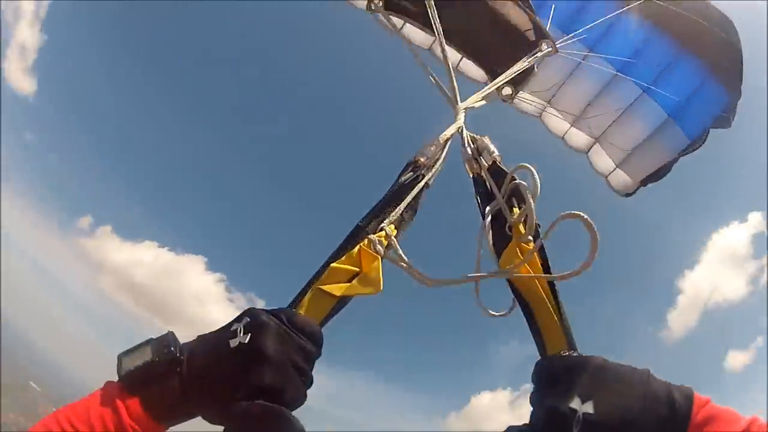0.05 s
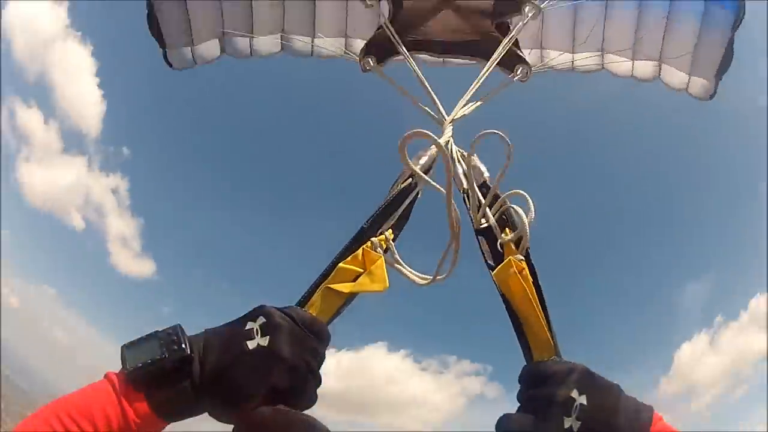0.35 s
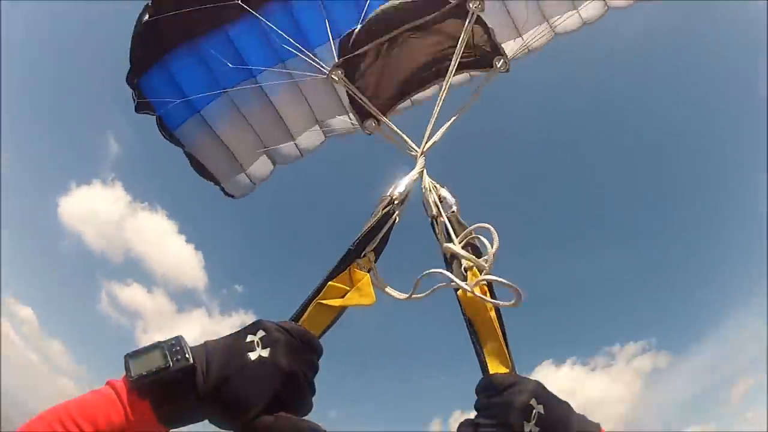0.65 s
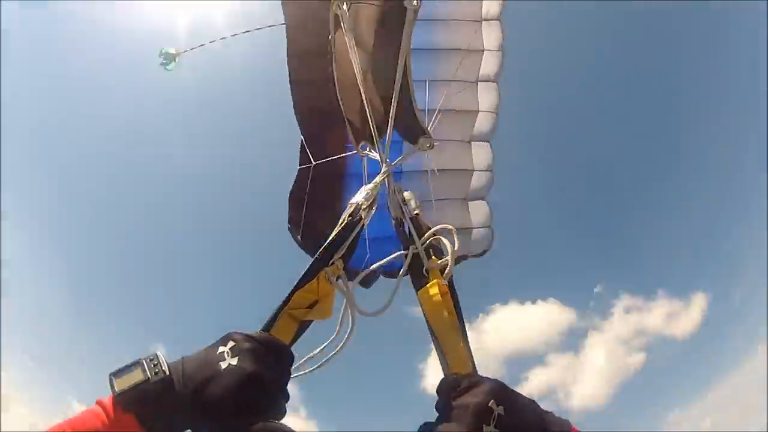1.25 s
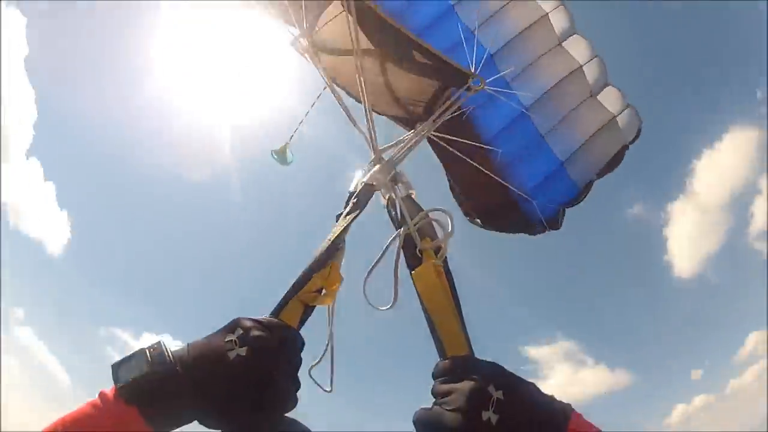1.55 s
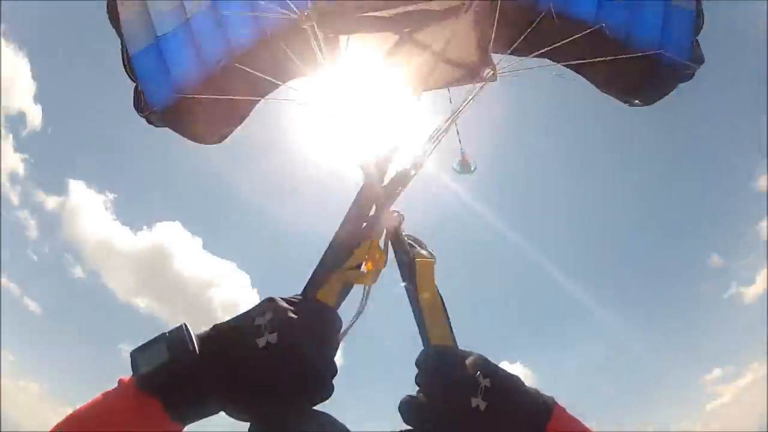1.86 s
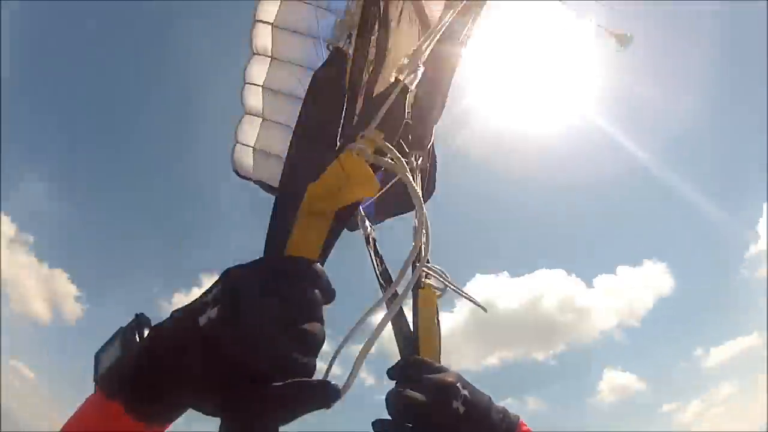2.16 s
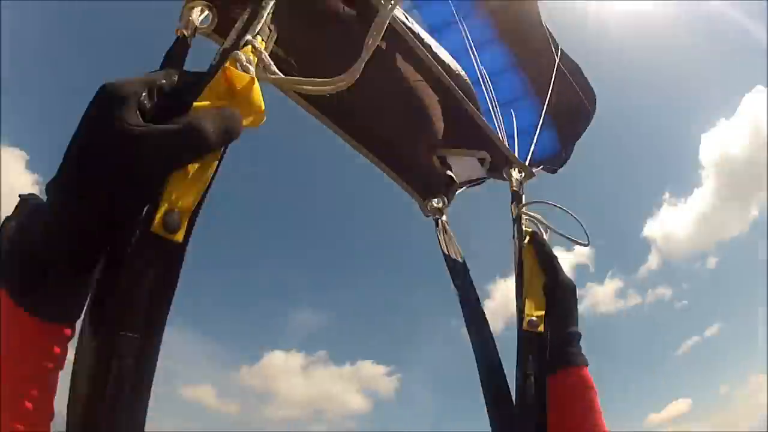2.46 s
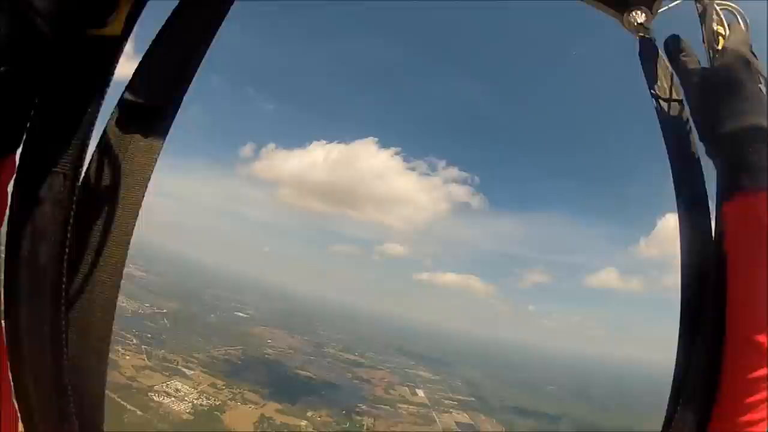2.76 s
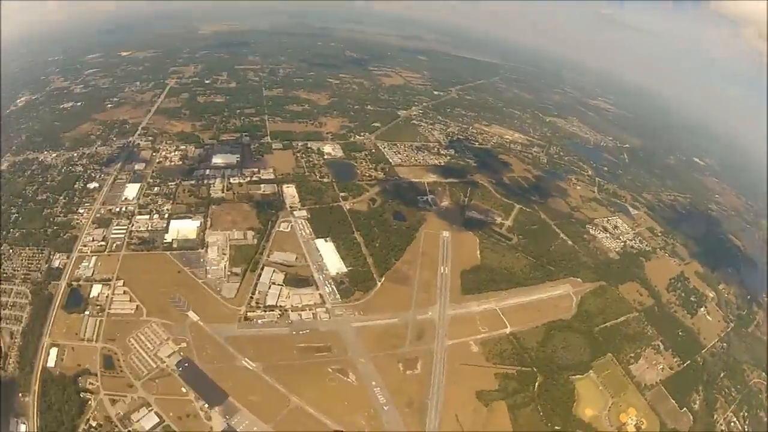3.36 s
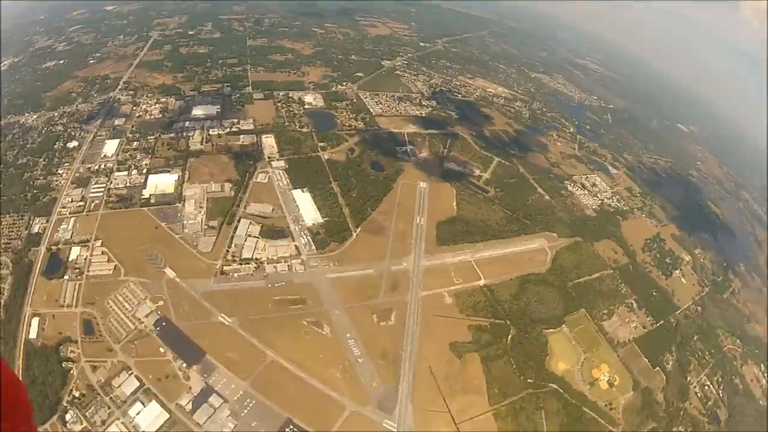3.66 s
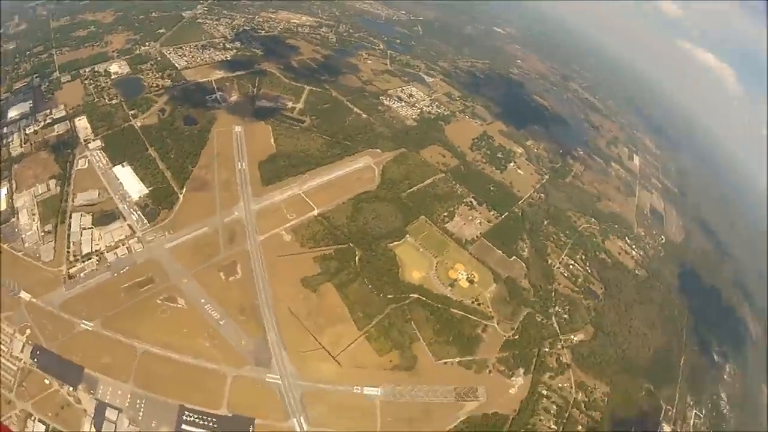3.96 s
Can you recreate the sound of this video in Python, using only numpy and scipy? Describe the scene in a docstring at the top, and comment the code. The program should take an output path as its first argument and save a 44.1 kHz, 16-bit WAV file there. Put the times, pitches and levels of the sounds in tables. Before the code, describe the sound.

Wind hisses in swells and rumbles on a helmet microphone under an open parachute, with a low thump at the start. Fabric flutters and straps scrape lightly, and the lines whistle faintly between 1 and 2 seconds. Near 2.5 seconds a strap squeaks briefly and snaps tight. Fabric flicks follow around 3 seconds, soft knocks at 3.4, and a hard, booming knock on the helmet just before 4.

```python
"""A low thump of wind and a hiss of air, heard under an open parachute from a camera case on a helmet.
The air rushes past in swells, sings faintly on the lines and shakes the closed case into a rumble.
Fabric flutters and flicks, the risers (the straps up to the lines) scrape, and one strap squeaks and
snaps tight. At the end something knocks hard on the helmet and makes it boom.
The camera's coarse sampling mirrors the sound into the treble."""
import sys
import numpy as np
from scipy import signal
from scipy.fft import rfft, irfft, next_fast_len
from scipy.io import wavfile
from scipy.ndimage import uniform_filter1d, map_coordinates

SR = 44100
rng = np.random.default_rng(int(sys.argv[2]) if len(sys.argv) > 2 else 0)


def generate_wav(sig):
    """Save sig (samples, or channels by samples) to the path in sys.argv[1] as 16-bit PCM at SR."""
    pcm = np.round(np.clip(np.atleast_2d(sig).T, -1, 1) * 32767).astype(np.int16)
    wavfile.write(sys.argv[1], SR, pcm)


N = 176400
T = np.arange(N) / SR

# Levels are relative. A colour says how strong each pitch is in a noise; t60 is the time to fade 60 dB.
# how loud the rushing air is, in six stretches: t/s, level/dB
RUSH_LEVELS = [
    [(0.0, -49.5), (0.222, -54.5), (0.284, -49.5), (0.304, -62), (0.418, -66), (0.432, -57), (0.72, -66)],
    [(0.79, -52.5), (0.844, -48), (1.054, -44), (1.064, -42), (1.224, -43), (1.234, -45.5), (1.3, -43)],
    [(1.33, -44.5), (1.336, -41.5), (1.362, -46), (1.44, -42.5), (1.654, -47), (1.682, -54), (1.76, -53)],
    [(1.8, -50), (1.95, -49.5), (2.038, -44), (2.064, -45.5), (2.282, -40), (2.362, -50), (2.41, -50)],
    [(2.63, -50.5), (2.664, -49), (2.872, -47.5), (2.882, -44.5), (2.908, -50), (2.92, -47), (3.08, -45.5)],
    [(3.13, -44.5), (3.242, -48.5), (3.408, -50), (3.436, -53), (3.718, -43), (3.846, -39), (3.93, -44.5)],
]
# where the hiss has its broad peak: t/s, f/Hz
RUSH_PEAK = [(0, 1780), (.8, 1770), (1.35, 1640), (1.48, 2100), (1.64, 1780), (1.82, 2090), (2.2, 2430),
             (2.4, 1930), (2.8, 1730), (3.1, 2160), (3.38, 1620), (3.7, 2230), (4, 2270)]
# colour of the hiss: f/Hz, level/dB
RUSH_COLOUR = [(150, -20.5), (450, -17), (600, -1), (730, -19), (900, -15), (1080, -1.5), (1230, 6.5),
               (1420, -3), (1700, -1.5), (2300, -2.5), (2800, -7.5), (3250, -12.5), (3620, -4), (4050, -18),
               (4400, -19), (5100, -21.5), (5480, -10), (5800, -34)]
# air singing on the lines: t/s, length/s, f/Hz, glide/(Hz per s), level/dB
WHISTLES = [(1.616, 0.12, 1680, -600, -49), (2.025, 0.04, 2250, 1503, -43), (0.995, 0.17, 3730, 0, -55),
            (1.265, 0.14, 3700, 0, -57.5)]

# slow swings of air pressure: t/s, level/dB
SWAY_LEVELS = [(0.0, -48), (0.17, -55), (0.71, -46), (0.98, -33), (1.0, -41), (1.88, -57), (2.3, -49),
               (3.86, -54), (3.9, -41.5)]
# wind shaking the case: t/s, deep level/dB, upper level/dB
RUMBLE_LEVELS = [(0.0, -43, -41.5), (0.05, -22.5, -39.5), (0.09, -44.5, -36.5), (0.24, -28, -48.5),
                 (0.28, -45, -40), (0.36, -35.5, -48), (0.41, -42, -43), (0.51, -37, -46), (0.56, -45, -43),
                 (0.84, -36, -42), (0.93, -32.5, -40.5), (0.95, -35, -35), (1.13, -39.5, -43),
                 (1.49, -44.5, -41), (1.53, -33, -40.5), (1.68, -41.5, -45.5), (1.78, -37.5, -41),
                 (2.12, -41.5, -37.5), (2.21, -35.5, -36.5), (2.42, -41, -56), (2.45, -46, -43),
                 (2.57, -34, -44.5), (2.68, -43, -39), (2.75, -31, -42.5), (2.91, -38, -44),
                 (2.96, -32, -39.5), (3.01, -40, -48), (3.3, -45.5, -44), (3.34, -37.5, -39),
                 (3.55, -39, -49), (3.85, -40.5, -44), (3.89, -37, -41)]
# colours of the swings, the deep rumble and the upper rumble: f/Hz, level/dB
SWAY_COLOUR = [(8, -18), (25, 8), (40, 2), (70, -15), (200, -58)]
DEEP_COLOUR = [(10, -51), (35, -20), (50, -6.5), (65, -13), (83, 2.5), (105, -11.5), (150, -13), (400, -75)]
UPPER_COLOUR = [(60, -30), (100, -4), (128, 2), (165, -2.5), (205, -3.5), (260, -13.5), (320, -8.5),
                (410, -19.5), (600, -23), (900, -35.5), (2000, -48)]
# single strong swirls of air: t/s, length/s, f/Hz, level/dB
SWIRLS = [(0.044, 0.012, 78, -17), (0.506, 0.033, 79.6, -29), (.81, 0.018, 78, -26),
          (0.968, 0.015, 84.5, -23), (1.033, .014, 89, -26), (1.917, 0.015, 125, -28),
          (2.103, .012, 118, -24.5), (2.766, 0.073, 82, -30.5), (2.952, 0.033, 86, -28),
          (3.345, .025, 117, -29.5)]

# fluttering fabric: t/s, level/dB
FLUTTER_LEVELS = [(0, -51), (.56, -53.5), (.92, -46), (1.3, -52), (1.55, -54), (1.8, -53.5), (2.08, -55.5),
                  (2.17, -42.5), (2.3, -54.5), (2.55, -52), (2.85, -46), (3.0, -47.5), (3.3, -50),
                  (3.5, -50), (3.9, -49)]
# flicks of fabric and lines: t/s, body level/dB, crisp edge level/dB, t60/s
FLICKS = [(0.084, -34, -53, .025), (0.1434, -39, -43, 0.023), (.26, -44, -43, .025),
          (.432, -46.5, -51, 0.069), (.583, -47, -48, .02), (.758, -43, -43, 0.019),
          (2.748, -37, -40.5, 0.039), (2.847, -30.5, -37, 0.032), (2.882, -33.5, -48, 0.048),
          (2.924, -47, -34, 0.023), (2.95, -43, -37, 0.047), (2.986, -37.5, -38, 0.042),
          (3.0966, -31.5, -28, 0.029), (3.371, -42.5, -58, 0.086), (3.396, -37.5, -56, 0.03)]
# thin scrapes of the risers: t/s, length/s, level/dB
SCRAPES = [(0.089, 0.0041, -48), (0.41, .005, -60), (0.436, .01, -57), (.585, .005, -58),
           (0.763, 0.0037, -52.5), (.781, 0.0034, -46), (0.842, 0.0054, -45.5), (0.867, 0.018, -50.5),
           (0.909, 0.0054, -43), (0.918, 0.048, -52.5), (0.966, 0.064, -54), (2.252, 0.089, -54),
           (2.852, .005, -49.5), (2.882, 0.011, -49.5), (3.086, 0.045, -47.5), (3.16, .03, -57.5),
           (3.693, 0.072, -50), (3.893, .005, -49)]
# colours of the fabric, a flick's crisp edge and a scrape: f/Hz, level/dB
CLOTH_COLOUR = [(100, -60), (300, 18), (450, 3), (620, 5), (800, 4.5), (920, 1.5), (1230, 5.5),
                (1500, -1.5), (2100, -0.5), (3000, -10), (3650, -12), (4200, -27.5), (5500, -29.5),
                (5900, -60)]
EDGE_COLOUR = [(600, -25), (1100, -12), (1300, 6.5), (1900, 3.5), (2400, 0), (3200, -5.5), (3700, -4),
               (4400, -21.5), (5500, -22), (5900, -25)]
SCRAPE_COLOUR = [(500, -12), (1500, 10), (2800, 4.5), (3650, 2.5), (4300, -8.5), (5000, -3.5), (5480, 9.5),
                 (5900, -9)]

# squeaks of the slipping strap: t/s, length/s, middle f/Hz, level/dB
SQUEAKS = [(2.4242, .003, 2100, -34), (2.4285, .0045, 2450, -29)]
# the dull tug just before the snap: t/s, length/s, level/dB
TUG = (2.445, 0.0179, -33.5)
# the strap snapping tight: t/s, level/dB
SNAPS = [(2.4551, -12)]
# tones that the snap sets ringing: f/Hz, level/dB, t60/s
SNAP_TONES = [(306, -8.5, 0.046), (560, -10, 0.011), (1100, -9, 0.017), (1370, -10, 0.016),
              (2180, -11, 0.02)]
# colours of the tug and the snap's crack: f/Hz, level/dB
TUG_COLOUR = [(120, -25), (250, -1), (320, 3), (420, -8), (600, -7), (900, -18), (2000, -40)]
SNAP_COLOUR = [(200, 5.5), (1200, 0), (2300, -10), (3000, -9), (4000, -4.5), (4700, -18), (5500, -7.5),
               (5900, -30)]

# knocks on the helmet: t/s, level/dB, contact noise level/dB (relative to its knock)
KNOCKS = [(3.33, -27, -25), (3.372, -33.5, -1.5), (3.4009, -25.5, -3.5), (3.945, -3, -12),
          (3.9637, -20, -8), (3.974, -12.5, -17)]
# tones at which helmet and case ring: f/Hz, level/dB, t60/s
HELMET_TONES = [(82, -40, 0.17), (112, -7.5, 0.13), (158, 9, 0.036), (202.6, -6.5, 0.14), (312, -19, 0.13),
                (607, -13, 0.051), (920, -20.5, 0.061), (1259, -19, 0.051)]
# colour of the contact noise: f/Hz, level/dB
KNOCK_COLOUR = [(100, 7), (420, -8.5), (600, 3), (770, -5), (920, 0), (1230, 2), (1500, -12), (1800, -4),
                (2400, -12), (3000, -18.5), (3800, -18), (4300, -39), (5900, -32)]


def amp(db):
    """Turn decibels into a number to multiply by."""
    return 10 ** (np.asarray(db) / 20)


def unit(x):
    """Scale x so that its average strength (rms) is 1."""
    return x / np.sqrt(np.mean(x ** 2) + 1e-20)


def curves(rows):
    """Join a table's points with straight lines: one curve for each column after the time."""
    times, *columns = np.transpose(rows)
    return [np.interp(T, times, column) for column in columns]


def wobble(rate):
    """A smooth curve through `rate` random points a second."""
    return map_coordinates(rng.standard_normal(2000), [T * rate], mode="wrap")


def filtered(x, response):
    """Multiply each frequency in x by response(hz)."""
    size = next_fast_len(N + 8192)
    return irfft(rfft(x, size) * response(np.fft.rfftfreq(size, 1 / SR)), size)[:N]


def noise(colour):
    """Noise of strength 1 in the given colour."""
    points_hz, db = np.transpose(colour)
    white = rng.standard_normal(N)
    return unit(filtered(white, lambda hz: amp(np.interp(np.log(hz + 1), np.log(points_hz), db))))


def swell(at, length):
    """A smooth rise and fall, highest at time `at`."""
    return np.exp(-2 * ((T - at) / length) ** 2)


def decay(at, t60, rise_s):
    """A quick rise from time `at`, then a fade."""
    age = np.maximum(T - at, 0)
    return np.exp(-np.log(1000) * age / t60) * (1 - np.exp(-age / rise_s))


def ring(at, tones, rise_s):
    """The fading tones of something struck at time `at`."""
    return sum(amp(db) * decay(at, t60, rise_s) * np.sin(2 * np.pi * hz * (at - T))
               for hz, db, t60 in tones)


def rushing_air(patchy_db, gust_db, grain_db, peak_db=8, peak_octaves=0.37, gain_db=1):
    """Passing air hisses unevenly, with a broad peak that drifts in pitch as the head turns."""
    hz, times, spectrum = signal.stft(noise(RUSH_COLOUR), SR, nperseg=512)
    centre_hz = np.interp(times, *np.transpose(RUSH_PEAK))
    peak = np.exp(-.5 * (np.log2((hz[:, None] + 1) / centre_hz) / peak_octaves) ** 2)
    specks = rng.standard_normal(spectrum.shape)
    patches = unit(uniform_filter1d(uniform_filter1d(specks, 5, 0), 12, 1))  # blur over pitch and time
    _, hiss = signal.istft(spectrum * amp(peak_db * peak + patchy_db * patches), nperseg=512)
    level_db, = curves(np.concatenate(RUSH_LEVELS))
    return unit(hiss[:N]) * amp(gain_db + level_db + gust_db * wobble(24.94) + grain_db * wobble(300))


def singing_lines(width_hz):
    """Air sings on the lines in short, breathy whistles, some sliding in pitch."""
    out = np.zeros(N)
    for at, length, hz, glide, db in WHISTLES:
        phase = 2 * np.pi * (T - at) * (hz + glide * (T - at) / 2)
        whistle = wobble(width_hz) * np.sin(phase) + wobble(width_hz) * np.cos(phase)
        out += amp(db) * swell(at, length) * whistle
    return out


def wind_on_case(lump_db, sway_gain_db=-1, deep_gain_db=-1.5, upper_gain_db=-0.5):
    """Swirls of air push on the case: slow swings and a lumpy rumble. The strongest make it boom."""
    sway_db, = curves(SWAY_LEVELS)
    deep_db, upper_db = curves(RUMBLE_LEVELS)
    sway = noise(SWAY_COLOUR) * amp(sway_gain_db + sway_db)
    deep = noise(DEEP_COLOUR) * amp(deep_gain_db + deep_db + lump_db * wobble(20))
    upper = noise(UPPER_COLOUR) * amp(upper_gain_db + upper_db + lump_db * wobble(40))
    booms = sum(amp(db) * swell(at, length) * np.sin(2 * np.pi * hz * (T - at))
                for at, length, hz, db in SWIRLS)
    return sway + deep + upper + booms


def cloth(flap_db, grain_db, flutter_gain_db=-2, flick_rise_s=0.0004):
    """Fabric flutters all along and flicks sharply; the risers scrape in grainy bursts."""
    flick_body = sum(amp(db) * decay(at, t60, flick_rise_s) for at, db, _, t60 in FLICKS)
    flick_edge = sum(amp(db) * decay(at, t60, flick_rise_s) for at, _, db, t60 in FLICKS)
    scrapes = sum(amp(db) * swell(at, length) for at, length, db in SCRAPES)
    flutter_db, = curves(FLUTTER_LEVELS)
    flutter = amp(flutter_gain_db + flutter_db) * unit(amp(flap_db * wobble(90)))
    grains = unit(amp(grain_db * wobble(700)))
    fabric = noise(CLOTH_COLOUR) * (grains * flutter + flick_body)
    return fabric + noise(EDGE_COLOUR) * flick_edge + noise(SCRAPE_COLOUR) * grains * scrapes


def strap(crack_db, crack_t60, overtone_db, fall_octaves_per_s=55):
    """A strap slips with falling squeaks, tugs, then snaps tight with a crack and a short ring."""
    at, length, db = TUG
    out = amp(db) * swell(at, length) * noise(TUG_COLOUR)
    for at, length, hz, db in SQUEAKS:
        pitch = hz * 2 ** (-fall_octaves_per_s * np.clip(T - at, -length, length))
        phase = 2 * np.pi * np.cumsum(pitch) / SR
        out += amp(db) * swell(at, length) * (np.sin(phase) + amp(overtone_db) * np.sin(2 * phase))
    crack_noise = noise(SNAP_COLOUR)
    for at, db in SNAPS:
        crack = amp(crack_db) * crack_noise * decay(at, crack_t60, rise_s=0.00028)
        out += amp(db) * (ring(at, SNAP_TONES, rise_s=0.00044) + crack)
    return out


def helmet_knocks(contact_t60):
    """Each knock makes a short noise at the contact and sets the helmet and case booming."""
    contact_noise = noise(KNOCK_COLOUR)
    out = np.zeros(N)
    for at, db, contact_db in KNOCKS:
        contact = amp(contact_db) * contact_noise * decay(at, contact_t60, rise_s=0.00033)
        out += amp(db) * (ring(at, HELMET_TONES, rise_s=0.0029) + contact)
    return out


def scene():
    """Air and gear add up at one microphone."""
    air = rushing_air(patchy_db=1.3, gust_db=.5, grain_db=0.78)
    air += singing_lines(width_hz=130)
    air += wind_on_case(lump_db=1.0)
    gear = cloth(flap_db=2.5, grain_db=3.5)
    gear += strap(crack_db=-5.5, crack_t60=0.016, overtone_db=-18.5)
    gear += helmet_knocks(contact_t60=0.04)
    return (air + gear)[None]


def record(dry):
    """The camera holds each sample at a low rate, which mirrors the sound around that rate."""
    hold_hz, band_hz, top_hz = 12000, 5850, 15400
    base = filtered(dry[0], lambda hz: 1 / np.sqrt(1 + (hz / band_hz) ** 120) * (hz < hold_hz / 2))
    slope = filtered(base, lambda hz: 1j * hz)  # faster wiggles leave a stronger mirror image
    shifted = 2 * np.cos(2 * np.pi * hold_hz * T) * slope  # copies below and above the hold rate
    mirror = filtered(shifted, lambda hz: 1 / (1j * np.maximum(hz, hold_hz / 2)))
    limited = np.clip(base + mirror, -1, 1)  # peaks past full scale are cut flat
    return filtered(limited, lambda hz: hz < top_hz)[None]


dry = scene()
out = record(dry)
generate_wav(out)
```